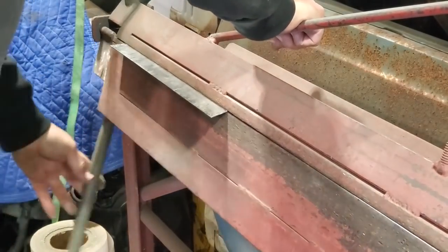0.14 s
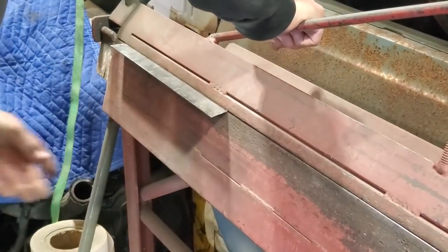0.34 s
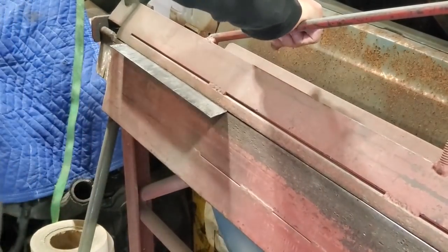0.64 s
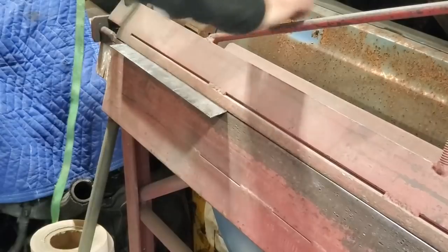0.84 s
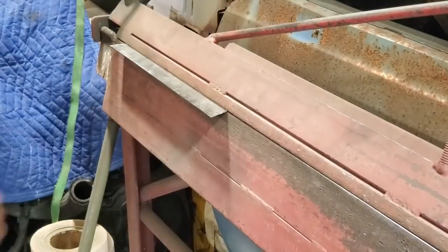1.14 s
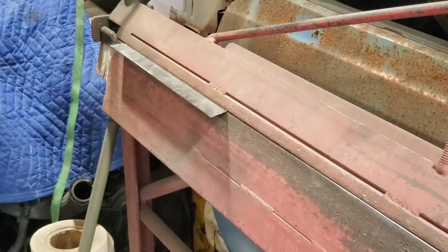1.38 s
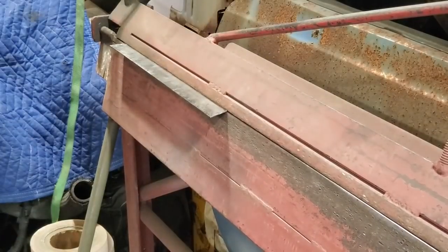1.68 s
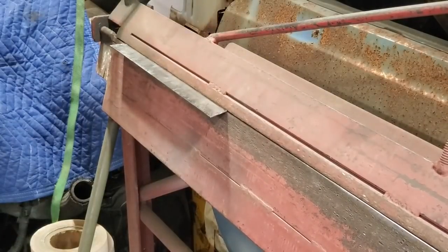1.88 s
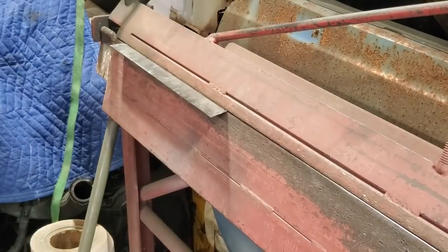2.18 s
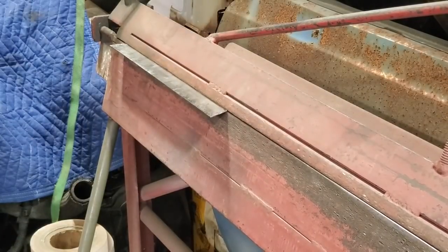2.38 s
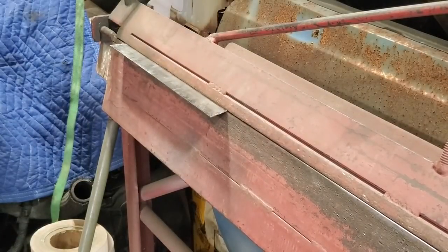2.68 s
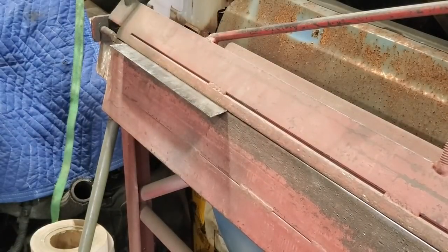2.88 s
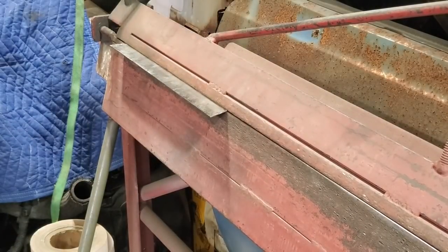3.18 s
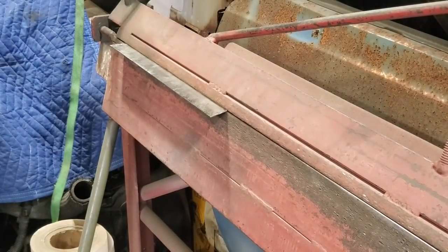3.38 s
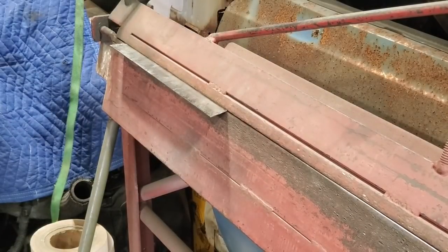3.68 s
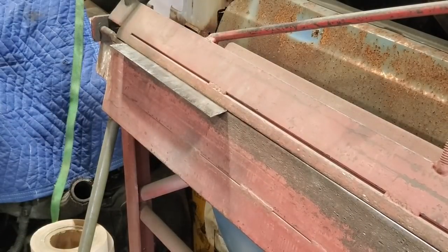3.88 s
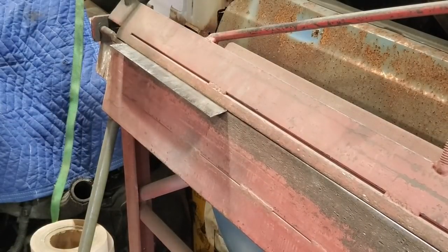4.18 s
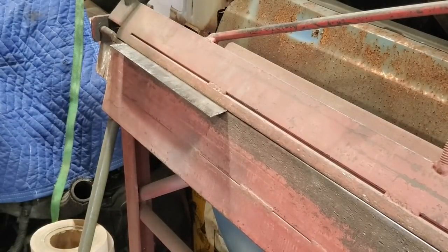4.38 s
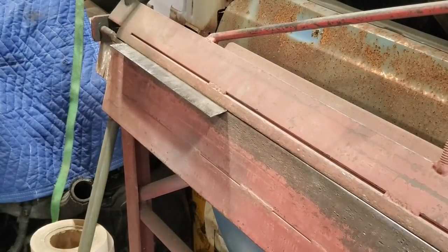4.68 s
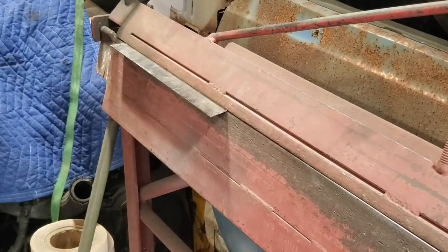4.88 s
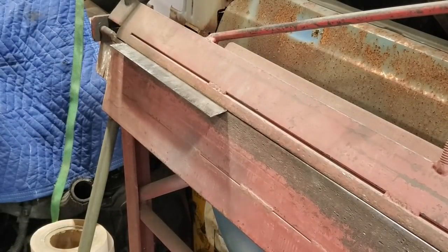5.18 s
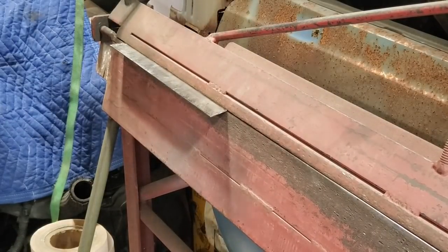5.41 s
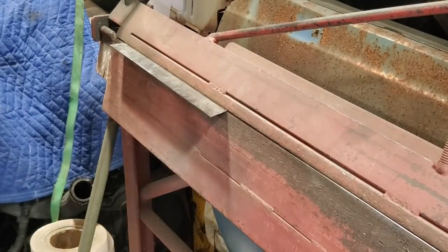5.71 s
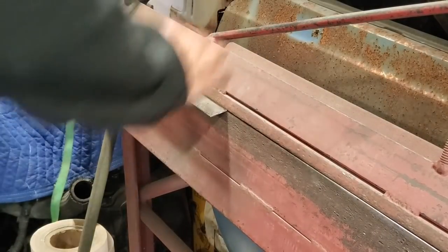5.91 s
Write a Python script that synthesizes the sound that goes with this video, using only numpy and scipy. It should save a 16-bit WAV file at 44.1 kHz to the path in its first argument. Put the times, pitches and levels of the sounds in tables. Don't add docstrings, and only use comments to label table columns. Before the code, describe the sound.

Soles scrape a gritty floor around a metal bending brake; heavy steel rasps and groans across metal in two bursts, with low thuds.

```python
import sys
import numpy as np
from scipy import signal
from scipy.fft import rfft, irfft, next_fast_len
from scipy.io import wavfile
from scipy.ndimage import map_coordinates

SR = 44100
rng = np.random.default_rng(int(sys.argv[2]) if len(sys.argv) > 2 else 0)


def digitize_waveform(pressure):
    field = np.atleast_2d(pressure).T
    bounded = np.clip(field, -1, 1)
    quanta = np.round(bounded * 32767).astype(np.int16)
    wavfile.write(sys.argv[1], SR, quanta)


def undo_db(level):
    steps = np.asarray(level, float) / 20
    return 10 ** steps


N = 266805
SIZE = next_fast_len(N + SR)
HZ = np.maximum(np.arange(SIZE // 2 + 1) * SR / SIZE, 1)
STEP = 16
SLOW_S = np.arange(0, N, STEP) / SR


def at_hz(points, hz, column=1):
    rows = np.array(points)
    return np.interp(np.log(hz), np.log(rows[:, 0]), rows[:, column])


def in_time(rows):
    s, *columns = np.transpose(rows)
    return [np.interp(SLOW_S, s, column) for column in columns]


def drift(rate_hz):
    return map_coordinates(rng.standard_normal(400), [SLOW_S * min(rate_hz, 60)], order=3)


def per_sample(slow):
    return slow.repeat(STEP)[:N]


# Hz, t60 in s, level in dB against the direct sound, left-right likeness 0-1.
SHOP_ECHO = [(100, .22, -4, .9), (300, .28, -2, .65), (700, .28, 2, .15), (3000, .28, 4, .05),
             (7000, .16, 4, 0), (14000, .1, 1, 0)]


def two_ears(common, own):
    alike = np.clip(at_hz(SHOP_ECHO, HZ, column=3), 0, 1)
    return np.sqrt(1 + alike) * common + np.sqrt(1 - alike) * own * [[1], [-1]]


# Hz, level in dB per Hz.
AIR_COLOUR = [(18, -40), (30, 5.5), (221, -10), (266, -11), (937, -8.5), (1250, -13.5), (3140, -12),
              (8080, -19), (14800, -25), (16000, -29)]
AIR_DB = -59


def background():
    noise = two_ears(*rfft(rng.standard_normal((2, SIZE))))
    air = irfft(noise * undo_db(at_hz(AIR_COLOUR[:-1], HZ)), SIZE)[:, :N]
    return undo_db(AIR_DB + 2.5) * air / air.std()


def ring(at_s, strength_db, hz, t60_s):
    clicks = np.full(N, 1e-18)
    clicks[(np.asarray(at_s) * SR).astype(int)] = undo_db(strength_db)
    r, w = undo_db(-60 / (max(t60_s, .01) * SR)), 2 * np.pi * hz / SR
    return signal.lfilter([0, np.sin(w)], [1, -2 * r * np.cos(w), r * r], clicks)


# start in s, peak in dB, Hz, t60 in s.
THUDS = [(0.634, -35, 80.7, 0.069), (1.038, -35, 95.5, 0.047), (1.4135, -30, 110, 0.12),
         (1.467, -28, 237, 0.042), (1.499, -39, 90, 0.05), (1.532, -30, 80, 0.029),
         (1.941, -43, 110, 0.072), (2.0436, -29, 126, 0.074), (3.171, -24, 123.3, 0.31),
         (3.221, -21.5, 113, 0.097), (4.503, -38.5, 79, 0.19), (4.863, -26, 110, 0.17),
         (5.018, -33, 85, 0.056), (5.532, -19.5, 353, 0.063), (5.668, -19.5, 344, 0.036)]
THUD_LAG_S = .008


def thuds():
    rings = np.zeros(N)
    for s, db, hz, t60_s in THUDS:
        rings += ring([s + THUD_LAG_S], db - 3.0, hz, t60_s)
        rings += ring([s + THUD_LAG_S], db - 1.5, 1.76 * hz, 0.25 * t60_s)
    return signal.sosfilt(signal.butter(2, 400, fs=SR, output="sos"), rings)


# start in s, peak in dB, brightness in dB per octave,
# thump in Hz, ring length 0-1.
KNOCKS = [(0.001, -42, 3, 540, 0.7), (0.145, -35.5, -3.5, 576, 0.9), (0.152, -34, 3, 732, 0.15),
          (0.423, -37, 0, 805, 0.07), (2.05, -30, -4, 610, 0.01), (2.06, -25.5, -2, 262, 0.07),
          (4.509, -37, -13, 275, 0), (4.606, -45.5, -9, 627, 0.2), (4.865, -25.5, 3, 950, 0),
          (6.011, -34, 0, 704, 0.1), (5.97, -31, -1, 695, 0.5)]
# Hz, level in dB, t60 in s.
LEVER_MODES = [(422, -3, 0.36), (545, -5, 0.78), (668, -38, 2.6), (732, 0, 0.4), (1033, -2.5, 0.32),
               (1020, -64, 0.29), (1272, -2, 1.8), (1585, 2, 0.19), (2310, -108, 0.19), (2370, -52, 0.083)]
KNOCK_LAG_S, CRACK_DB, CRACK_T60_S = .002, -3, 0.036


def knocks():
    out = np.zeros(N)
    luck_db = rng.normal(0, 3, (len(KNOCKS), len(LEVER_MODES)))
    dull = signal.butter(2, [500, 1900], "band", fs=SR, output="sos")
    cracks = signal.sosfilt(dull, rng.standard_normal((len(KNOCKS), SR // 2)))
    for (s, db, bright, thump_hz, length), strengths_db, crack in zip(KNOCKS, luck_db, cracks):
        start = int((s + KNOCK_LAG_S) * SR)
        t = np.arange(min(SR // 2, N - start)) / SR
        blow = undo_db(db - 2.0 - 60 * t / 0.039) * np.sin(2 * np.pi * thump_hz * t)
        crack_fall_db = 60 * t / max(0.13 * length, CRACK_T60_S)
        blow += undo_db(db + CRACK_DB - crack_fall_db) * crack[:len(t)] * np.minimum(t / KNOCK_LAG_S, 1)
        for (hz, level_db, t60_s), own_db in zip(LEVER_MODES, strengths_db):
            fall_db = 60 * t / max(length * min(t60_s, 220 / hz), .01)
            mode_db = db + level_db - 7.5 + own_db + bright * np.log2(hz / 600)
            blow += undo_db(mode_db - fall_db) * np.sin(2 * np.pi * hz * t)
        out[start:start + len(t)] += blow
    return out


# start in s, peak in dB.
TINGS = [
    (3.5805, -32),
    (3.6302, -36),
]
# Hz, level in dB, t60 in s.
PART_MODES = [(1340, -5, 0.93), (3830, 2, 0.28), (4930, -6, 0.066)]


def tings():
    s, db = np.transpose(TINGS)
    return sum(ring(s, db + level_db - 16.0, hz, t60_s) for hz, level_db, t60_s in PART_MODES)


ZONE_EDGES_HZ = [50, 400, 1800, 7000, 16000]
CATCH_RISE_S = .0025
BAND_OCTAVES = .3


def friction(zones_db, jolts, colour, grains_per_s, spread_db, clump_db, patchy_db, patch_rate, jolt_db):
    sizes_db = spread_db * np.minimum(rng.exponential(1, N), 4)
    snaps = (rng.random(N) < grains_per_s / SR) * undo_db(sizes_db)
    grit = snaps * rng.choice([-1, 1], N) * per_sample(undo_db(clump_db * drift(55)))
    grit /= grit.std()

    response = undo_db(at_hz(colour[:-1], HZ))
    zones_hz = zip(ZONE_EDGES_HZ, ZONE_EDGES_HZ[1:])
    share = [np.mean(response ** 2 * (HZ > low) * (HZ < high)) for low, high in zones_hz]
    drive_db = zones_db - 10 * np.log10(share)[:, None]
    middles = np.log2([150, 900, 3600, 11000])

    fades = []
    for s, _, _, _, t60_s in jolts:
        since_s = SLOW_S - s
        fall = undo_db(-60 * np.maximum(since_s, 0) / max(t60_s, .02))
        fades.append(np.clip(since_s / CATCH_RISE_S + 1.26, 0, 1) * fall)

    total = 0
    for octave in np.arange(5.5, 14.5, BAND_OCTAVES):
        place = np.interp(octave, middles, range(4))
        low = min(int(place), 2)
        stroke = undo_db(drive_db[low] + (place - low) * (drive_db[low + 1] - drive_db[low]))
        burst = sum(undo_db(db + jolt_db - max(narrow, 0) * abs(octave - np.log2(hz))) * fade
                    for (_, db, hz, narrow, _), fade in zip(jolts, fades))
        burst = burst * (octave > 9) / np.sqrt(share[2] + share[3])
        patch = undo_db(patchy_db * drift(patch_rate))
        gain = np.hypot(stroke * patch, burst)
        band = np.clip(1 - abs(np.log2(HZ) - octave) / BAND_OCTAVES, 0, 1)
        total = total + band * rfft(per_sample(gain) * grit, SIZE)
    return irfft(total * response, SIZE)[:N]


# peak time in s, rise in s, strength in dB,
# weight in dB in the lows, grit in dB in the highs.
SCUFFS = [(0.0, .01, -42.5, 9.5, -24), (0.155, .008, -66, 20, -25), (0.31, 0.057, -34, -8, -16),
          (0.427, 0.2, -41, -5.5, -3.5), (0.485, 0.07, -49.5, -17, -4), (0.645, 0.02, -40, -4.5, -2.5),
          (0.935, 0.029, -50.5, -7, 7.5), (0.988, 0.12, -35, -10.5, -10), (1.165, 0.033, -42, -13, -3.5),
          (1.44, 0.022, -45, -2.5, 3), (1.468, 0.05, -39.5, -4, -3.5), (1.865, 0.055, -52, -29, -2),
          (1.96, 0.026, -63, 5, 11), (2.08, 0.036, -46.5, 5.5, 5), (3.582, .006, -50, -13, -8),
          (3.68, 0.23, -58.5, -4, -3.5), (3.842, 0.016, -68, -7, -3), (4.264, 0.052, -58, -11, -15),
          (4.322, 0.013, -41, -15, -23), (4.39, 0.22, -49.5, -4, 1), (4.488, 0.037, -57, -15, 10.5),
          (4.887, 0.031, -31.5, -2.5, -1.5), (4.96, .06, -31, -13, -11), (5.975, 0.15, -41.5, 9, -6)]
# time in s, level in dB, weight in dB.
SHUFFLE = [(.12, -68, 8), (.23, -70, 8), (.45, -60, 0), (.85, -60.5, 1), (1.3, -59.5, 0), (1.55, -58, 5),
           (1.8, -61, -1.5), (2.2, -54, 2.5), (2.4, -57.5, 8), (3.5, -67, 6.5), (3.9, -81, 18.5),
           (4.22, -81, 15), (4.45, -61, 4), (4.72, -60.5, 5), (4.83, -66, 5), (5.3, -61, 12.5),
           (5.8, -64, 2), (6.05, -65, 3)]
FALL_DB_PER_S = [130.5, 169, 195, 200]
SWELL_DB = 26
SCUFF_RUMBLE_DB, SCUFF_RUMBLE_FOLLOWS = -11.5, 0.99
SHUFFLE_RUMBLE_DB, SHUFFLE_RUMBLE_FOLLOWS, SHUFFLE_HISS_DB = 1.5, 1.18, -2.5


def scuff_zones():
    db, weight = in_time(SHUFFLE)
    rumble = db + SHUFFLE_RUMBLE_DB + SHUFFLE_RUMBLE_FOLLOWS * weight
    power = undo_db(2 * np.array([rumble, db + weight, db, db + SHUFFLE_HISS_DB]))
    for s, rise_s, db, weight, grit in SCUFFS:
        since_s = SLOW_S - s
        swell = SWELL_DB * since_s / max(rise_s, .005)
        shape = np.where(since_s < 0, swell, -np.outer(FALL_DB_PER_S, since_s))
        zones = db + np.array([SCUFF_RUMBLE_DB + SCUFF_RUMBLE_FOLLOWS * weight, weight, 0, grit])
        power = power + undo_db(2 * np.maximum(zones[:, None] + shape, -150))
    return 10 * np.log10(power)


# start in s, peak in dB, centre in Hz, narrowness in dB per octave, t60 in s.
SLIPS = [(0.258, -29, 3250, 3, 0.21), (0.2944, -18, 3080, 20, 0.2), (0.34, -22, 2500, 6, 0.4),
         (0.641, -29, 3030, 6, 0.1), (0.9033, -32, 12000, 13, 0.16), (0.9794, -22, 3160, 8, 0.07),
         (1.158, -31, 5270, 3, 0.15), (1.4232, -35, 13200, -1, 0.12), (1.4694, -30, 2620, 13, 0.081),
         (1.8594, -31, 3610, 6, 0.14), (1.955, -34, 13000, 9, 0.12), (2.058, -26, 13100, 1.5, 0.086),
         (3.577, -21, 4930, 7, 0.1), (3.8394, -48, 2200, 3, 0.12), (4.33, -33, 3300, 13, 0.3),
         (4.473, -28.5, 11200, 3, 0.13)]
# Hz, level in dB per Hz.
SCUFF_COLOUR = [(24, -33), (40, 8.5), (215, 4), (715, -3), (790, -4.5), (1090, -6.5), (2910, -13),
                (7730, -18.5), (14800, -14.5), (16000, -22)]


def scuffs():
    return friction(scuff_zones() - 3.0, SLIPS, SCUFF_COLOUR, grains_per_s=9000, spread_db=2.5, clump_db=2.0,
                    patchy_db=2.5, patch_rate=18, jolt_db=-14.5)


# start in s, length in s, Hz, width in Hz, level in dB.
GROANS = [(2.455, 0.16, 785, 43, -41), (2.48, 0.18, 1130, 39, -37.5), (2.72, 0.1, 1044, 170, -36.5),
          (2.88, 0.24, 1007, 230, -40.5), (3.165, 0.081, 326, 68, -34), (3.12, .035, 975, 150, -35),
          (3.2, .2, 950, 60, -51), (3.11, .03, 1350, 200, -39), (0.148, .02, 1600, 200, -48),
          (0, .06, 2450, 150, -61), (0.965, .03, 3800, 2500, -47), (1.46, .02, 5000, 4000, -47),
          (4.32, .07, 3300, 1500, -53), (2.053, .01, 1300, 400, -46), (2.41, 0.085, 2700, 38, -37),
          (2.51, .08, 3880, 130, -35), (2.5, 0.042, 3700, 130, -34), (2.7, 0.092, 4430, 150, -33),
          (2.7, 0.077, 2900, 240, -36.5), (2.9, .1, 4250, 80, -35.5), (3.0, 0.12, 4610, 110, -39),
          (3.09, 0.045, 2850, 190, -39), (3.215, 0.058, 3900, 140, -40), (5.03, .04, 5800, 100, -44),
          (5.1, 0.17, 4200, 250, -38.5), (5.3, 0.024, 293, 31, -42), (5.2, .2, 1120, 29, -41.5),
          (5.35, 0.065, 4360, 70, -30.5), (5.35, 0.074, 5200, 430, -34.5),
          (5.36, 0.062, 13300, 1500, -29.5), (5.41, 0.19, 301.5, 56, -36.5), (5.4, 0.15, 552, 180, -44),
          (5.45, 0.18, 2750, 300, -39), (5.617, .04, 11400, 500, -43), (5.93, 0.093, 985, 30, -43),
          (5.92, .015, 1400, 120, -38.5), (5.95, 0.039, 1680, 160, -45), (5.912, 0.025, 2840, 270, -48.5)]
GROAN_RISE_S, GROAN_FALL_S, GROAN_FLUTTER_DB = 0.0076, 0.055, 0


def groans():
    out, noise = np.zeros(N), rng.standard_normal(N)
    flutter = per_sample(undo_db(GROAN_FLUTTER_DB * drift(25)))
    for s, length_s, hz, width_hz, db in GROANS:
        start = int(s * SR)
        span = slice(start, start + SR // 2)
        r = np.exp(-np.pi * width_hz / SR)
        mode = [0.99, 0, -0.998, 1, -2 * r * np.cos(2 * np.pi * hz / SR), r * r]
        tone = signal.sosfilt([mode] * 2, noise[span])
        t = np.arange(len(tone)) / SR
        shape = np.clip(t / GROAN_RISE_S, 0, 1) * np.exp(-np.maximum(t - length_s, 0) / GROAN_FALL_S)
        out[span] += tone / tone.std() * shape * undo_db(db) * flutter[span]
    return out


# time in s, speed as rasp level in dB, weight bearing down in dB.
DRAGS = [
    [(2.24, -43.5, -5), (2.29, -39.5, 0), (2.36, -37, -2), (2.43, -30, -1), (2.5, -26, 5.5),
     (2.57, -28.5, 1.5), (2.68, -32.5, -3)],
    [(2.72, -22.5, -4), (2.87, -29, -0.5), (3.0, -25.5, -4.5), (3.13, -26, 5), (3.19, -31, 8),
     (3.25, -31, 7.5), (3.4, -45.5, 12), (3.52, -56.5, 5)],
    [(4.97, -38, -1), (5.035, -20, 3.5), (5.1, -27.5, 1.5), (5.24, -28, 0.5), (5.38, -22.5, 0),
     (5.58, -26, 3), (5.612, -37, 14.5), (5.68, -26, 6), (5.89, -45, 11.5)],
]
LIFTED_S = [2.22, 3.56, 4.95, 5.93]
# level in dB against the rasp, share of weight, extra share of speed.
DRAG_ZONES_DB = [-16, -6.5, -0.5, -2.5]
DRAG_WEIGHT_SHARES = [1.06, 0.59, -0.062, -0.39]
DRAG_SPEED_SHARES = [0.015, 0, 0, 0.22]
MEAN_SPEED_DB = -28


def drag_zones():
    lifted = [(s, -90, 0) for s in LIFTED_S]
    moving = [tuple(row) for stroke in DRAGS for row in stroke]
    speed_db, weight = in_time(sorted(lifted + moving))
    tilt = np.outer(DRAG_WEIGHT_SHARES, weight) + np.outer(DRAG_SPEED_SHARES, speed_db - MEAN_SPEED_DB)
    return speed_db + np.array(DRAG_ZONES_DB)[:, None] + tilt


# start in s, peak in dB, centre in Hz, narrowness in dB per octave,
# t60 in s.
CATCHES = [(2.278, -14, 2460, 6, 0.33), (2.3525, -20, 5000, 9.5, 0.083), (2.6004, -11.5, 6000, 5, 0.11),
           (5.655, -17.5, 12000, -1, 0.091), (3.435, -38, 12000, 4, 0.065), (2.372, -4.5, 2870, 9.5, 0.36),
           (2.415, -14.5, 4740, -3, 0.36), (2.446, -5.5, 2600, 6, 0.14), (2.5006, -3, 4720, 1.5, 0.12),
           (2.6942, 3, 4060, 6, 0.12), (2.9016, -8, 4220, 5, 0.26), (2.9894, -11, 4550, 21, 0.48),
           (3.0995, -8.5, 4180, 2.5, 0.26), (3.2244, -10.5, 3830, 4, 0.46), (4.8824, -23, 3600, 9, 0.44),
           (5.026, -3.5, 5780, 3.5, 0.091), (5.353, 3, 4400, 5.5, 0.081), (5.42, -8, 4570, 6, 0.27),
           (5.6154, -4, 5000, 4, 0.19), (5.911, -16, 2700, 10.5, 0.51), (5.964, -24, 2580, 3.5, 0.14)]
# Hz, level in dB per Hz.
DRAG_COLOUR = [(24, -50.5), (40, 3.5), (115, 3), (249, 4.5), (297, 2.5), (630, -4), (1120, -4),
               (1210, -2.5), (2100, -8), (2630, -4.5), (3300, -4), (4340, -3.5), (8130, -5.5),
               (13800, -0.5), (16000, -27)]
# Hz, width in Hz, dB over the rasp in first, second and third stroke.
PLATE_MODES = [(112, 13, -9, -15, 4.5), (296.3, 1.8, -2, -8, 6), (341, 5.5, -6, -7, -24),
               (788, 20.3, 0, -8, -13), (960, 40, 4.5, 3, 3), (1018, 35, 5, 2.5, 1), (1086, 14, 7, 8, 7),
               (1139, 15, 10, 7, -2), (1316, 24, -9, -2, -4), (1553, 150, 6.5, -1, -1),
               (1946, 21, -4, -6, -2), (2527, 45, -6, -6, -2.5), (2668, 46, 4, 3.5, 1),
               (2850, 80, -14, 0, -3), (3008, 64, -12, 1.5, -0.5), (3460, 53, -14, -4.5, -16),
               (3840, 130, 1.5, 0, -2), (3903, 34, 3.5, 2, -2), (4030, 55, 0, 10, 0),
               (4260, 55, -2, 4.5, 4), (4330, 39, 5, -3, 0.5), (4440, 43, -5, -2.5, -6),
               (4610, 72, -2, 3, 1), (4665, 35, 4, -2, -6), (5160, 39, -5, 0, -4), (5530, 50, -1, -6, -6),
               (5800, 84, 3, -1, -2), (5935, 33, -4, 7, -3), (6350, 95, -2, 2, -4), (6850, 54, -1, -5, -4),
               (11320, 280, 8.5, 6, 2.5), (14100, 180, 0, -3, -9)]
REGRIP_S = 2.69


def drags():
    zones_db = drag_zones()
    rasp = friction(zones_db - 6.5, CATCHES, DRAG_COLOUR, grains_per_s=6000, spread_db=3.5, clump_db=1.8,
                    patchy_db=2.5, patch_rate=20, jolt_db=-15)
    out = rasp.copy()
    stroke = np.searchsorted([REGRIP_S, LIFTED_S[1]], SLOW_S)
    pressure_db = np.clip(1.4 * (zones_db[2] + 30), -14, 0)
    for hz, width_hz, *levels_db in PLATE_MODES:
        r = np.exp(-np.pi * width_hz / SR)
        drive = rasp * per_sample(undo_db(np.array(levels_db)[stroke] + pressure_db + 2.2 * drift(12)))
        poles = [1, -2 * r * np.cos(2 * np.pi * hz / SR), r * r]
        out += signal.lfilter([(1 - r * r) / 2, 0, (r * r - 1) / 2], poles, drive)
    return out


# Hz, turns of phase.
LEFT_LEAD = [(0, 0), (520, .03), (2930, 1.27), (5770, 2.26), (6800, 3), (22050, 3)]
# Hz, left over right in dB.
LEFT_GAIN = [(300, 0), (5000, 0.9), (9000, 4), (13000, 6)]


def shop(x, echoed):
    t, white, tails = np.arange(SR) / SR, rng.standard_normal((2, 2, SR)), 0
    log_hz, log_points = np.log(np.arange(SR // 2 + 1) + 1), np.log(np.array(SHOP_ECHO)[:, 0])
    for k, (_, t60_s, db, _) in enumerate(SHOP_ECHO):
        tail = white * undo_db(-60 * t / max(t60_s, .05)) * np.clip(t / 0.00077, 0, 1)
        band = np.interp(log_hz, log_points, np.arange(len(SHOP_ECHO)) == k)
        tails = tails + band * rfft(tail) * undo_db(db) / np.sqrt(np.mean(tail ** 2) * SR * 2)
    tails = rfft(irfft(tails, SR), SIZE)

    angle = per_sample(2.61 * drift(20))
    echo = rfft(echoed * np.cos(angle), SIZE) * tails[0] + rfft(echoed * np.sin(angle), SIZE) * tails[1]
    lean_db = at_hz(LEFT_GAIN, HZ) / 2
    lead = np.exp(1j * np.pi * np.interp(HZ, *np.transpose(LEFT_LEAD)))
    direct = rfft(x, SIZE) * np.array([undo_db(lean_db) * lead, undo_db(-lean_db) / lead])
    echo = two_ears(*echo) * undo_db([0.26 * lean_db, -0.4 * lean_db])
    return irfft(direct + echo, SIZE)[:, :N]


def scene():
    blows = undo_db(2.0) * (thuds() + knocks() + tings())
    rasping = scuffs() + groans() + drags()
    echoed = rasping + undo_db(-6) * blows
    return background() + shop(rasping + blows, echoed)


def low_pass(x):
    return signal.sosfilt(signal.butter(12, 16180, fs=SR, output="sos"), x)


def record(dry):
    cut = signal.sosfilt(signal.butter(4, 48, "high", fs=SR, output="sos"), dry)
    rounded = 0.77 * np.tanh(cut / 0.85)
    top_cut = signal.ellip(12, .5, 70, 15950, fs=SR, output="sos")
    return low_pass(signal.sosfilt(top_cut, rounded))


dry = scene()
out = record(dry)
digitize_waveform(out)
```